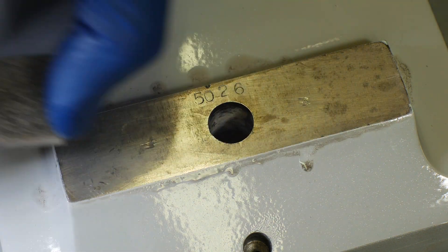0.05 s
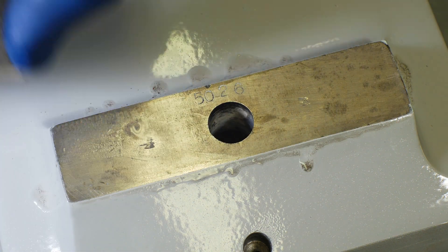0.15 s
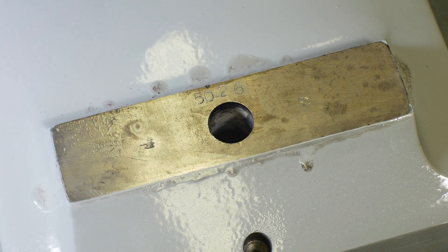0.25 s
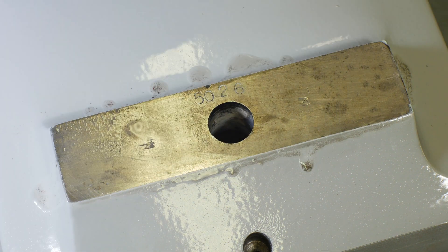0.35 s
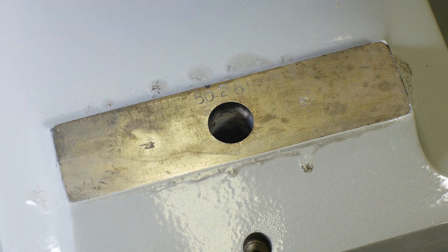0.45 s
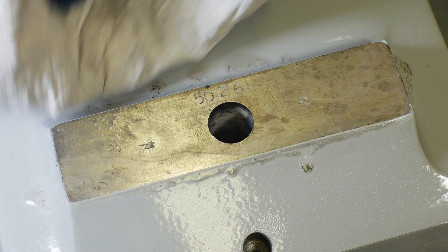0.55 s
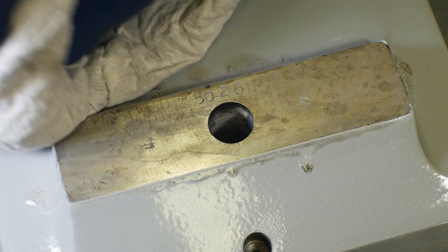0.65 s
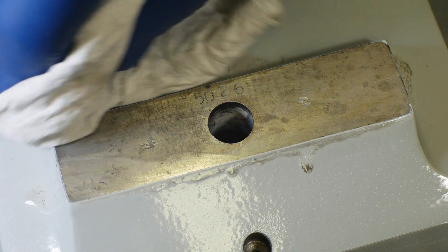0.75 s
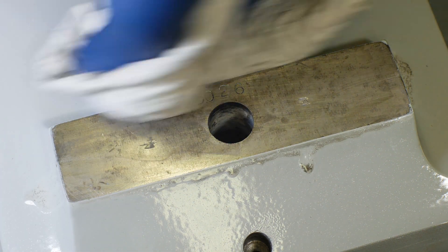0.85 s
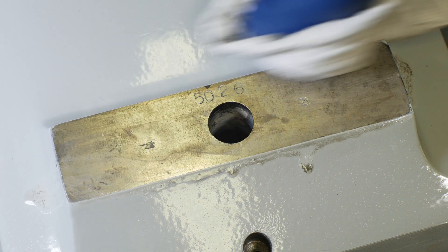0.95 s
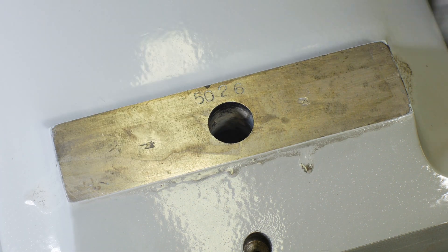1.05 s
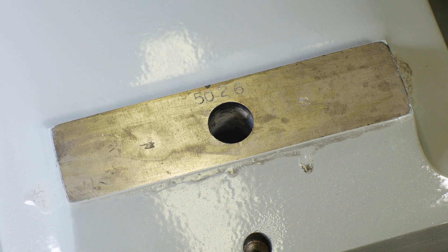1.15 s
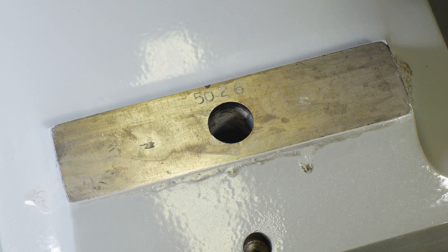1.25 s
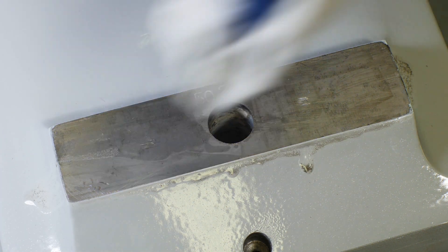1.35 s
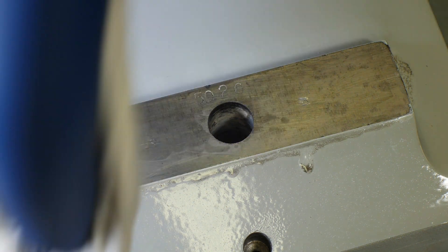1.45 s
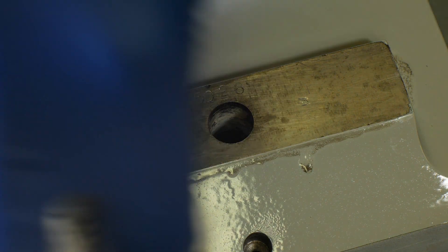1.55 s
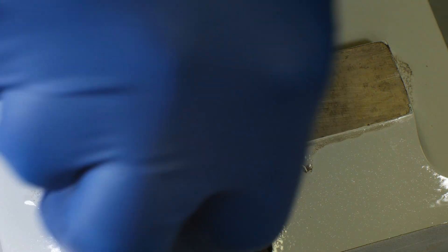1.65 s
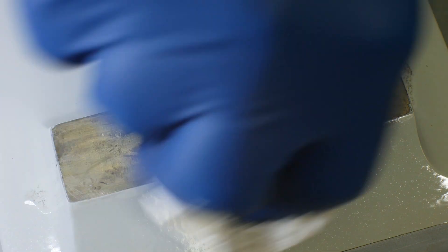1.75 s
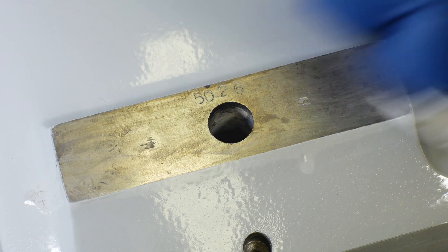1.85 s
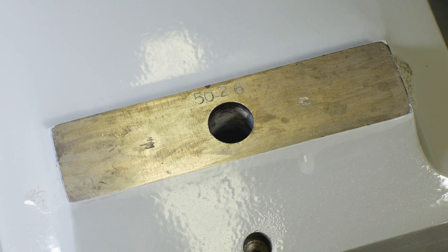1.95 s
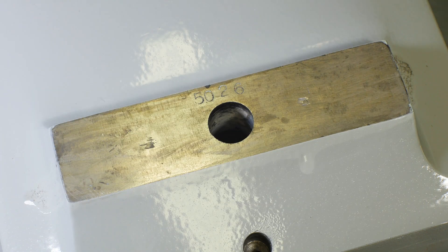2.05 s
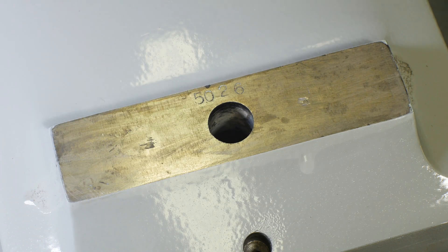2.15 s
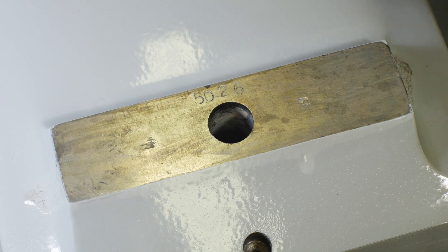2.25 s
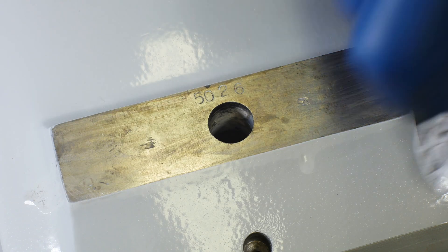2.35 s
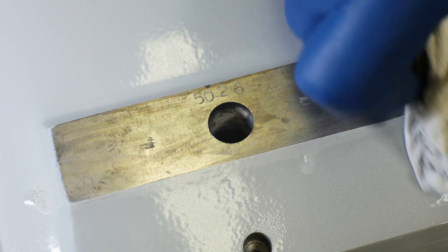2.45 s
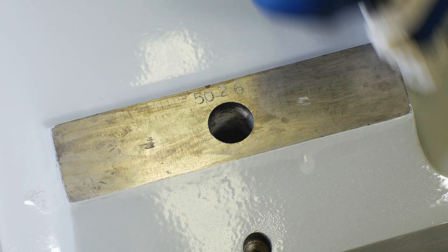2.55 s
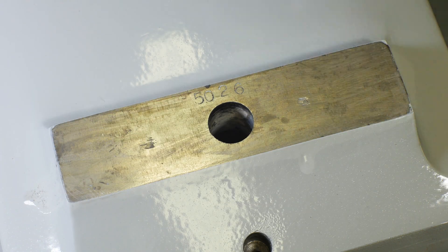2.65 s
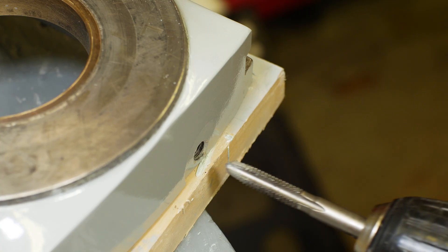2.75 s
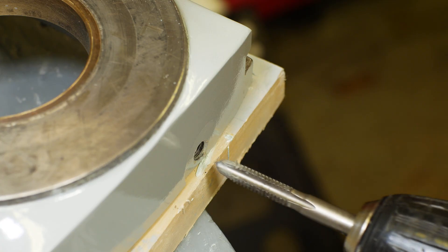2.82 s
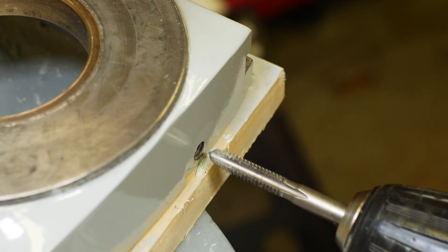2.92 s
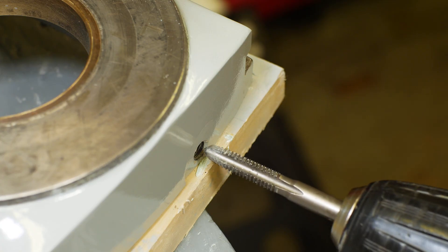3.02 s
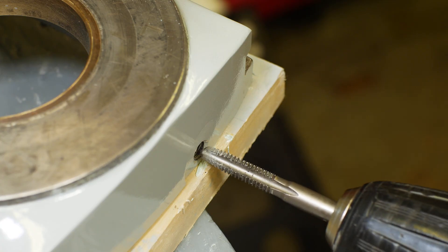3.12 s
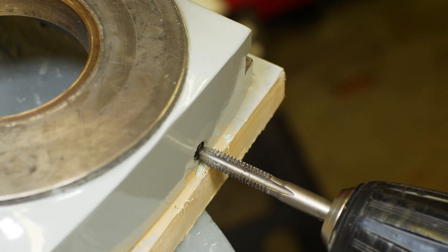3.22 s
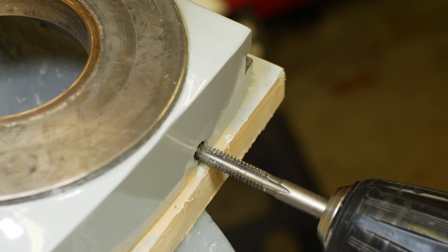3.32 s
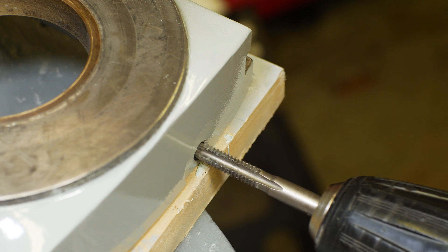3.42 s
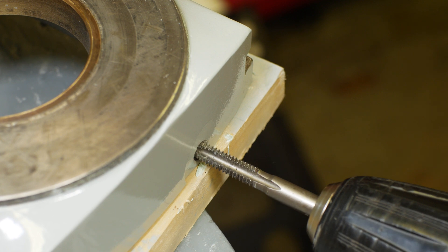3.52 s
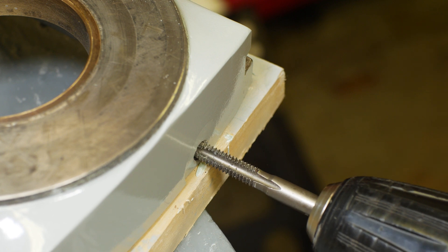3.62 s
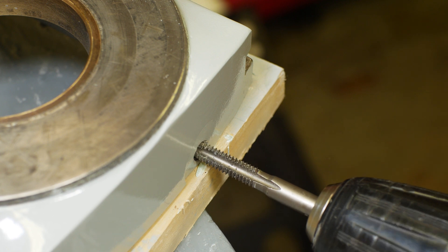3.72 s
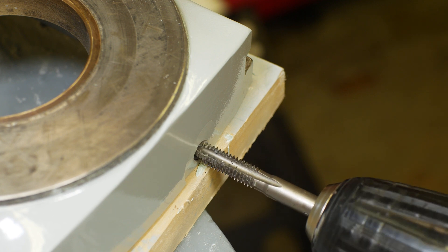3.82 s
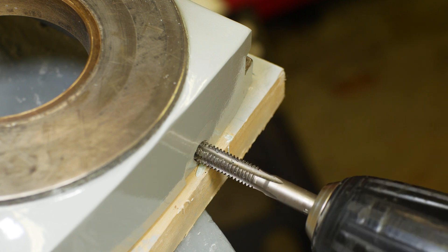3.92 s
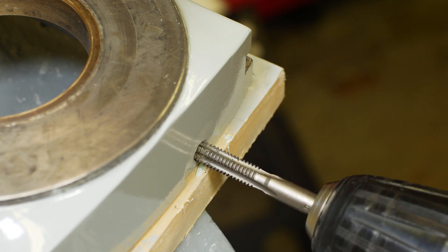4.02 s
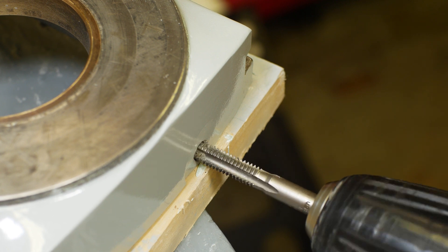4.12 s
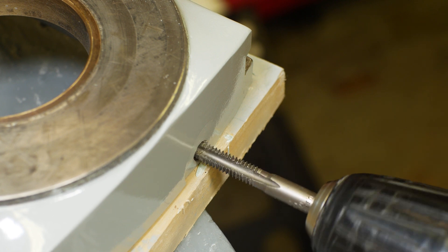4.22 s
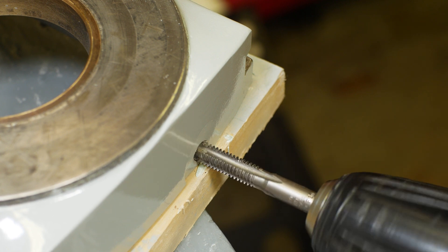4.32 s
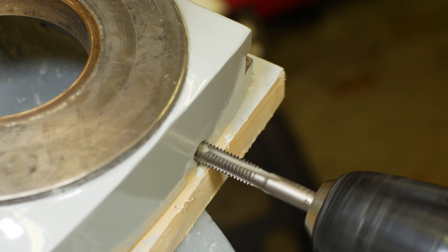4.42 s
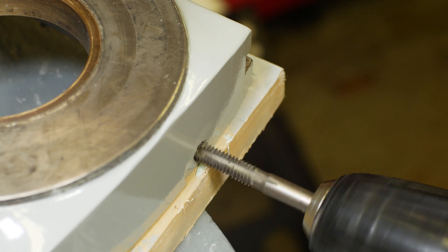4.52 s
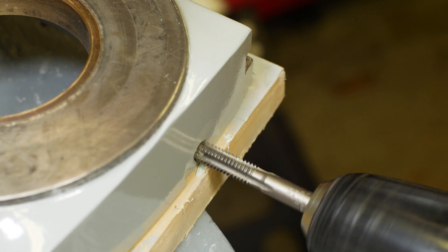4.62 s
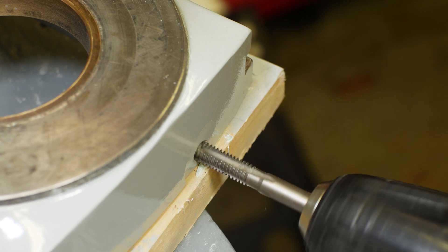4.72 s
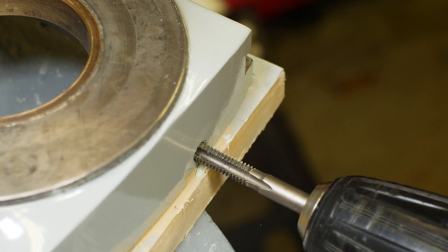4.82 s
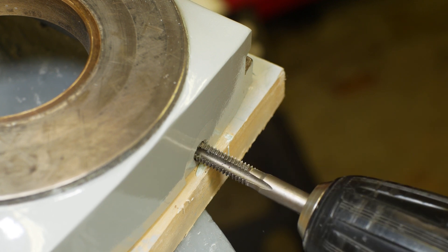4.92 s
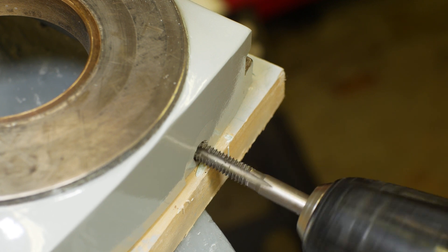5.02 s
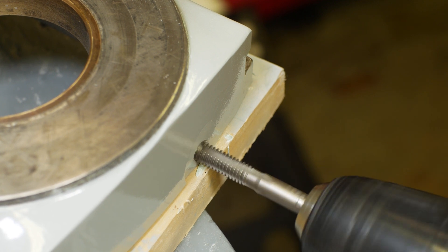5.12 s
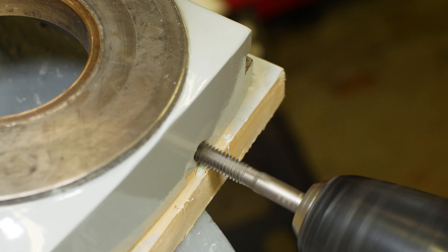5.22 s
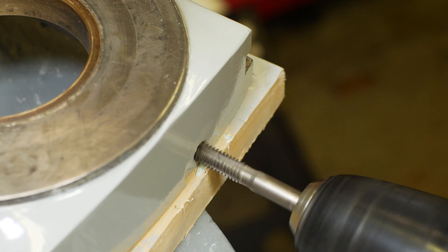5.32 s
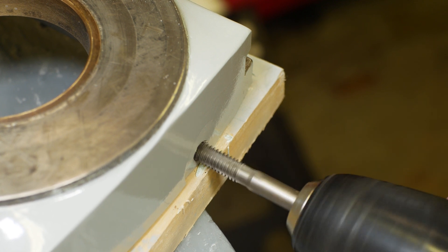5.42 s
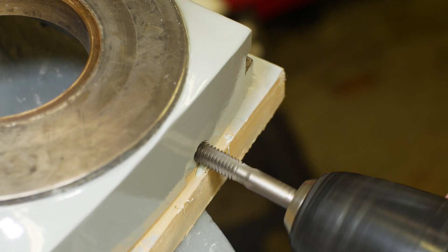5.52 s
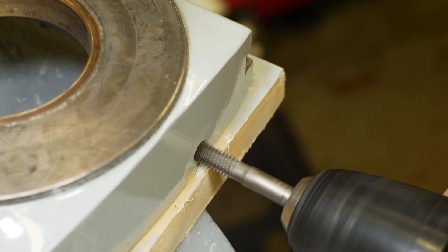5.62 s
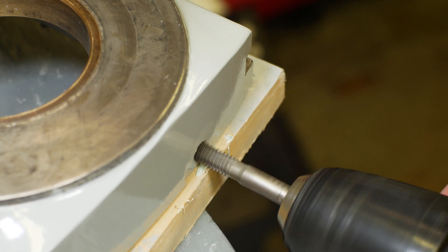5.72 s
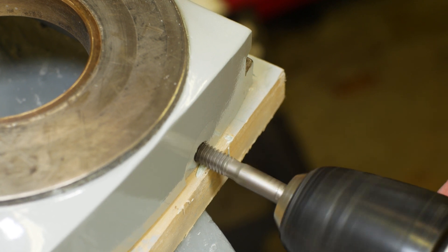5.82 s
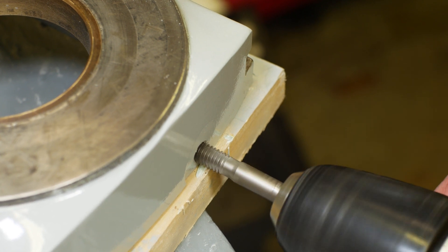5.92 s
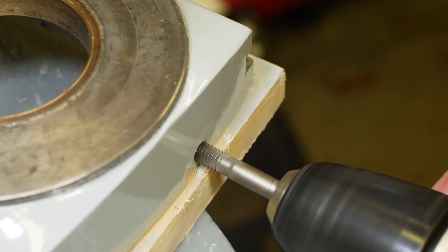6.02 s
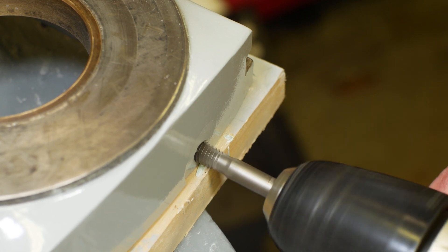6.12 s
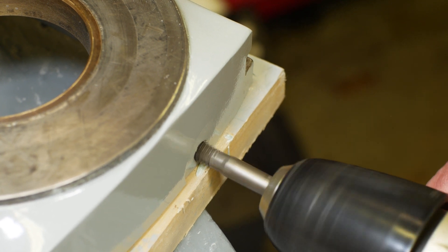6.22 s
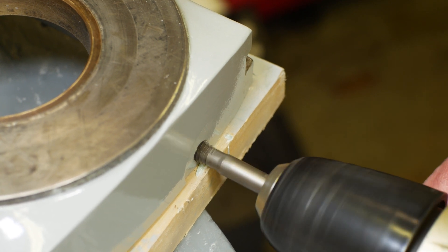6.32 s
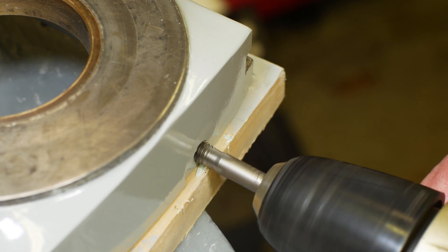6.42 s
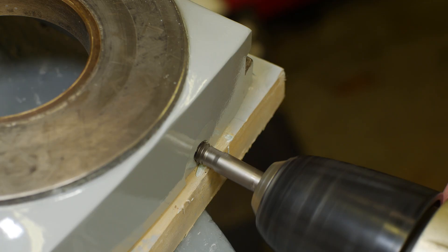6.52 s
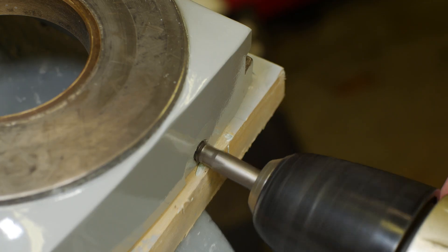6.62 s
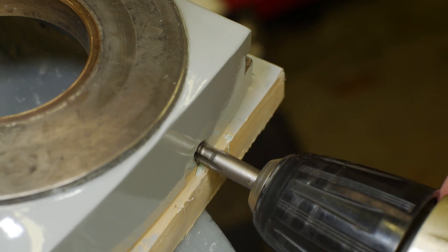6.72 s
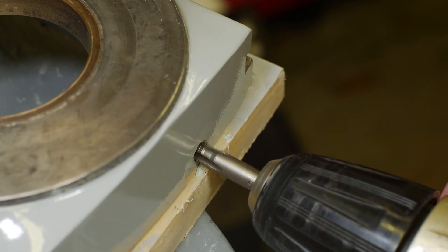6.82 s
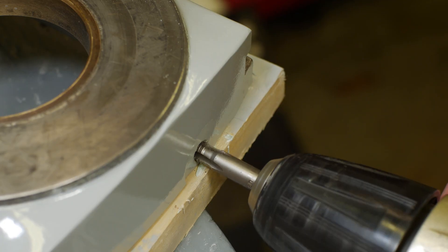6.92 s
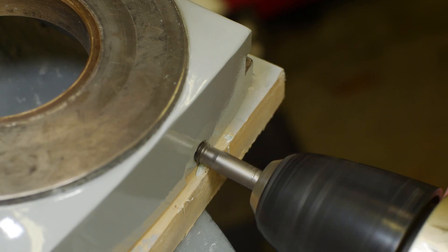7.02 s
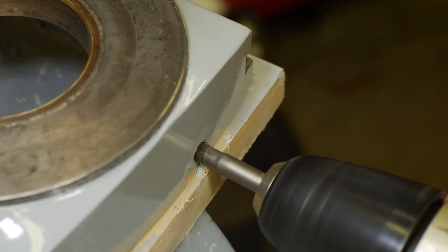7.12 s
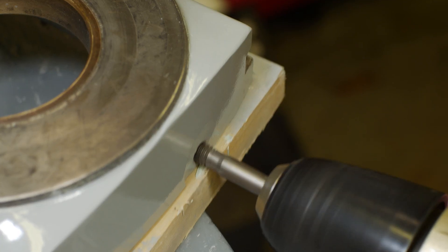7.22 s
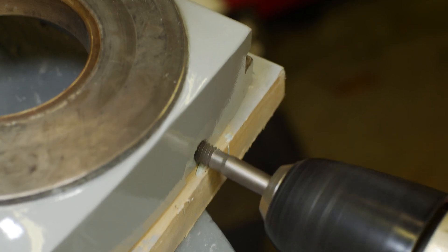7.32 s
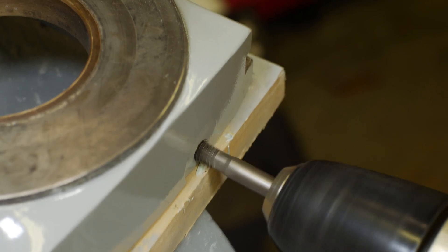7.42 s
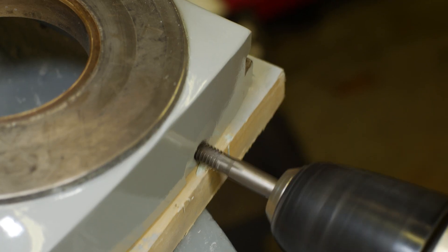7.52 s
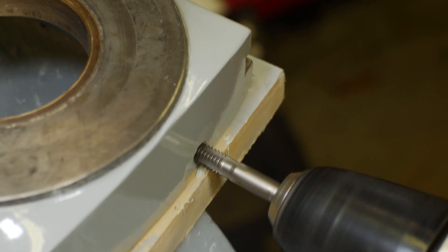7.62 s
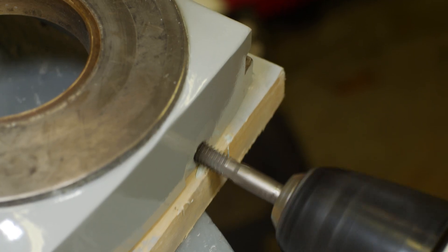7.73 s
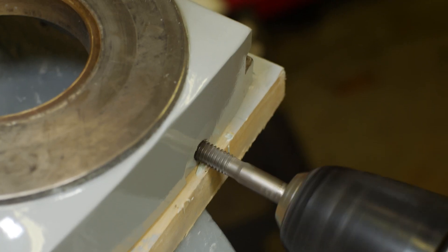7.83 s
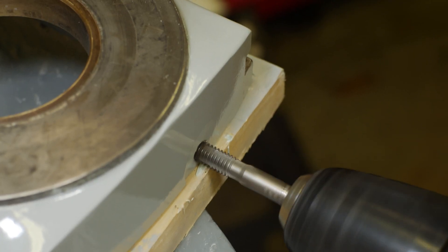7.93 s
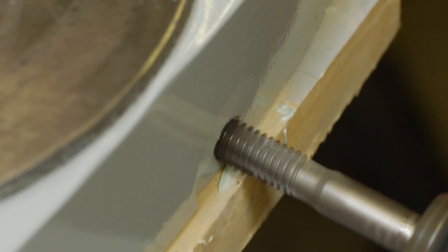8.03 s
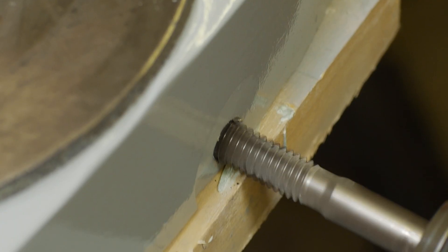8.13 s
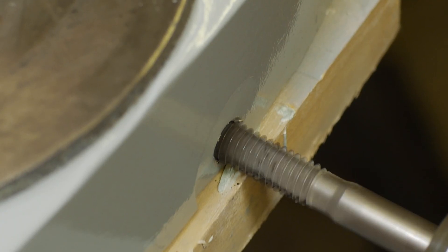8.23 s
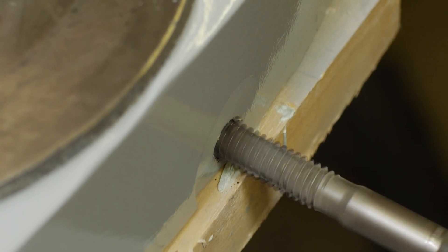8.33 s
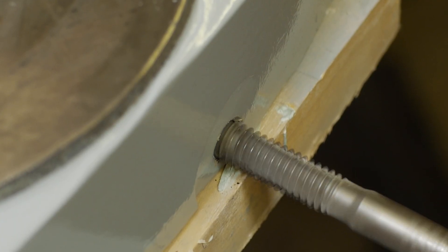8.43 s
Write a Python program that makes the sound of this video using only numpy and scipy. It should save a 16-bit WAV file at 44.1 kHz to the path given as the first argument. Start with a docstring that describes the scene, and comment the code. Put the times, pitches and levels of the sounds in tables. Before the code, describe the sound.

A close, nearly dry stereo scene in a quiet workshop with faint hiss and low mains hum. From 0 to 2.8 seconds a glove rustles softly and a stone makes short, faint gritty wipes over brass, with a dull double knock near 0.8, a click at 1.1 and quick scraping catches around 1.9 and 2.1. After a near-silent pause, a tap scuffs and bumps a hole at 3.5. From 3.7 the drill creeps, with a thin, wavering high whistle near 6 to 7 kilohertz and broken gear spurts, louder at 4.4 to 4.8. From 5.1 to 6.5 it churns strongly, rattling and throbbing, its whistle sliding down as it stalls. A short jerk follows at 6.6, then hard, sharp clacks at 7.0 as it reverses. It backs out in a steady whirring grind, gear tones climbing until the end near 8.4.

```python
"""Hand tapping with a cordless drill

A stone rasps over a brass pad on a casting (filtered grain noise) with soft knocks (damped modes) and clicks.
Then a drill drives a tap in: its speed control whistles (wavering sines), gears churn in spurts and stop
(grains over housing modes, gear tones), and the tap is backed out with rising gear tones.
Behind it, a quiet workshop: hiss and a mains hum."""
import sys
import numpy as np
from scipy import signal
from scipy.fft import rfft, irfft
from scipy.io import wavfile
from scipy.ndimage import map_coordinates

SR = 44100
rng = np.random.default_rng(int(sys.argv[2]) if len(sys.argv) > 2 else 0)


def master_out(mix):
    """Clip the mix to full scale and print it as 16-bit PCM to the path in sys.argv[1]."""
    frames = np.transpose(np.atleast_2d(mix))
    ceiling = np.clip(frames, -1, 1)
    pcm = np.round(ceiling * 32767).astype(np.int16)
    wavfile.write(sys.argv[1], SR, pcm)


N = 373086
T = np.arange(N) / SR
FREQ = np.maximum(np.fft.rfftfreq(N, 1 / SR), 1)

# Levels in the tables are relative: gains in the functions add to them.
# room noise spectrum: (frequency [Hz], level [dB])
AIR_SPECTRUM = [(25, -19), (60, 0.5), (95, 0), (160, 3), (260, -7), (800, -8.5), (1200, -13.5), (4000, -21),
                (10500, -24), (15000, -30)]
# mains hum lines: (frequency [Hz], rms level [dB])
HUM_LINES = [(119.8, -72)]
# wipes of the stone: (fastest moment [s], rise [s], fall [s], level [dB], treble change [dB],
# glove over stone [dB])
STROKES = [(.97, 0.11, 0.057, -55, 1, -17), (1.07, 0.059, 0.027, -70, 13.5, -19),
           (1.83, 0.061, 0.042, -57, -6, -28), (1.872, 0.026, 0.02, -51.5, 0.5, -5),
           (1.927, 0.032, 0.016, -60, 6, -5), (2.139, 0.019, 0.0099, -54.5, -7, -9),
           (2.335, 0.023, 0.015, -59, -6, -21), (2.565, 0.052, 0.045, -57.5, -11, -26),
           (2.625, 0.044, 0.035, -57, 7.5, -34)]
# gloved hand sliding on the casting: (start [s], end [s], glove level [dB], grit level [dB])
SLIDES = [(0.486, 1.13, -70, -73.5), (1.151, 1.664, -71, -75), (1.667, 1.968, -74, -76),
          (1.97, 2.045, -84, -80), (2.066, 2.788, -74, -71)]
# grit spectrum: (frequency [Hz], level [dB])
STONE_SPECTRUM = [(470, -43), (800, -12), (1290, -6.5), (2270, 0.5), (3080, -0.5), (6360, -4), (7740, -9.5),
                  (11200, -9.5), (15000, -24)]
# glove spectrum: (frequency [Hz], level [dB])
GLOVE_SPECTRUM = [(170, -4), (380, -2.5), (470, -5.5), (620, 1), (850, -9), (1300, -7), (1750, -3),
                  (3000, -14)]
# stone chattering on the pad edge: (hardest moment [s], rise [s], fall [s], level [dB])
CHATTERS = [(1.866, 0.013, 0.015, -45.5), (1.925, .004, 0.011, -52.5)]
# modes of the brass pad: (frequency [Hz], level [dB])
PAD_MODES = [(641, -4), (1130, -1.5), (1440, -3), (2380, -10), (3380, -10)]
# tap scuffing round the rim of the hole: (fastest moment [s], rise [s], fall [s], level [dB])
SCUFFS = [(3.485, 0.039, .025, -68.5), (3.52, 0.011, 0.033, -63)]
# scuff spectrum: (frequency [Hz], level [dB])
RIM_SPECTRUM = [(500, 6), (900, -1), (2000, 0), (3600, -4), (4600, -9)]
# dull bumps on the casting: (time [s], peak [dB], upper limit on mode t60 before a 0.98 factor [s])
BUMPS = [(0.051, -56, 0.14), (.777, -29, 0.15), (.787, -34, 0.12), (0.798, -33, 0.072), (0.839, -43, 0.25),
         (1.083, -43.5, 0.018), (1.926, -47, 0.046), (3.317, -66, 0.099), (3.471, -48.5, 0.17),
         (3.515, -40.5, 0.11), (3.526, -37, 0.081), (3.815, -56, 0.12), (3.843, -49.5, 0.33),
         (3.898, -55, 0.19), (4.325, -44, 0.31), (4.612, -32, 0.22)]
# low modes of the casting: (frequency [Hz], level [dB], longest t60 [s])
CASTING_MODES = [(136, 1, 0.15), (192, -1, 0.13), (278, 1, 0.3), (385, 3, 0.12), (570, -11, 0.04),
                 (668, -12, 0.14)]
# sharp contacts of stone, tap and drive: (time [s], peak [dB], centre [Hz],
# breadth [share of centre], t60 of the ring [s])
CLICKS = [(.051, -50, 10300, .06, .05), (.052, -51, 4500, .12, 0.045), (.368, -57.5, 2200, .15, 0.044),
          (.7245, -44.5, 2600, 0.55, .012), (1.081, -32, 1270, 1.6, 0.04), (1.849, -36, 1430, .55, .06),
          (1.923, -36, 2900, 0.4, 0.05), (2.138, -41, 2880, .55, .05), (2.309, -50, 2300, .55, 0.076),
          (3.515, -48, 2600, 0.44, .03), (3.518, -45, 880, .15, .11), (3.696, -52, 1500, .55, .04),
          (4.186, -46, 2100, .55, .04), (6.595, -31, 4200, .8, .04), (6.679, -30, 1800, 0.67, .04),
          (6.824, -46, 3300, 0.18, 0.04), (6.934, -43, 3400, .55, .04), (7.0043, -18, 2180, 1.2, .04),
          (7.0058, -20, 3600, .6, .045), (7.0072, -22, 1300, .7, .07), (7.0412, -18, 3500, .35, .01),
          (7.0768, -22.5, 3380, .3, .016)]
# speed control whistle, one row per catch: (start [s], end [s], pitch before sag and droop [Hz], level [dB])
WHISTLE = [(3.781, 4.118, 6900, -58.5), (4.134, 4.273, 6830, -55), (4.283, 4.405, 6950, -58),
           (4.414, 4.475, 6470, -53.5), (4.497, 4.545, 6330, -49.5), (4.603, 4.743, 6290, -46),
           (4.821, 4.892, 6900, -61), (5.139, 5.513, 6320, -46), (5.603, 5.665, 6330, -48),
           (5.69, 5.822, 6290, -45), (5.845, 5.915, 6300, -45), (5.95, 6.0, 6290, -46),
           (6.017, 6.355, 6290, -47), (7.09, 8.33, 6300, -48.5), (8.345, 8.44, 6300, -43.5)]
# load dragging the whistle down once the tap bites: (time [s], droop [Hz])
DROOP = [(4.95, 0), (5.14, 130), (5.37, 0), (5.51, 100), (5.6, 0), (7.08, 110), (7.37, 110), (7.53, 0),
         (7.88, 70), (8.06, 280), (8.16, 130)]
# whistle sliding near stall: (start [s], end [s], from [Hz], to [Hz], level [dB])
STALLS = [(4.123, 4.134, 6080, 6760, -57), (4.393, 4.415, 4700, 5830, -54.5),
          (4.475, 4.496, 3750, 4230, -43.5), (4.747, 4.783, 6000, 4900, -52),
          (4.78, 4.795, 4000, 3860, -42), (5.065, 5.095, 6500, 4630, -55),
          (5.088, 5.106, 3860, 4800, -42.5), (6.367, 6.5, 6160, 4130, -43),
          (6.595, 6.624, 3920, 4850, -38.5), (6.967, 7.085, 5100, 6200, -54)]
# motor shaft, one list per run at speed: (time [s], mean rate before load [turns/s], gear tone level [dB])
SHAFT_RUNS = [
    [(4.52, 172, -56), (4.56, 183, -48), (4.67, 181, -49), (4.83, 174, -54)],
    [(5.15, 172, -54), (5.65, 183, -47), (5.69, 222, -46), (5.73, 221, -42), (6.03, 232, -42),
     (6.38, 227, -43), (6.47, 181, -48)],
    [(7.06, 190, -52), (7.35, 217, -45), (7.45, 203, -50), (7.84, 200, -51), (7.91, 216, -45),
     (7.98, 213, -45), (8.04, 225, -42), (8.16, 254, -41.5), (8.28, 268, -48), (8.46, 284, -43)],
]
# gear tones: (multiple of the shaft rate, level [dB])
MESH = [(3, -8.5), (7, -1), (10, -8), (11, -8.5), (13, -3), (16, -8), (17, -4.5)]
# modes of drill housing and casting: (frequency [Hz], width [Hz], driving in [dB], backing out [dB])
HOUSING_MODES = [(671, 28, -20.5, -21.5), (845, 65, -16.5, -18.5), (1113, 40, -24.5, -25),
                 (1248, 65, -19, -19), (1575, 100, -16, -20), (1730, 45, -23, -24), (1900, 30, -27, -23.5),
                 (2165, 60, -20, -22), (2345, 105, -16.5, -19), (2500, 70, -20, -21), (2840, 40, -25, -21),
                 (2980, 170, -15.5, -21), (3400, 55, -23, -19.5), (3690, 130, -24, -19.5)]
# Stages of the drill's spurts, touching rows continuing one spurt; all three tables:
# (start [s], end [s], gear level [dB], shortfall at the start [dB], housing rumble over gears [dB],
# treble change [dB])
# the tap finds its way in: columns as above
CREEPS = [(3.70, 4.12, -73, -3, 1.5, 4.5), (4.128, 4.3, -65, 1.5, 1.5, 2), (4.3, 4.385, -67, -3, 5.5, 4),
          (4.4, 4.58, -43.5, 12.5, -2.5, -0.5), (4.575, 4.79, -41, -1, -5, -5.5),
          (4.79, 4.835, -45.5, -2.5, -5, -6), (4.84, 4.885, -60, -6, 2.5, -7)]
# the tap cuts: columns as above
CUTS = [(5.04, 5.08, -56, 9.5, -12, 10), (5.093, 5.24, -37.5, 7, -8, 0), (5.24, 5.6, -36.5, 2, -13.5, 1.5),
        (5.6, 6.42, -32.5, 1.5, -13.5, 2), (6.42, 6.53, -34, -3, -14, -1), (6.595, 6.705, -30.5, 3, -12, 1)]
# the tap is backed out: columns as above
BACKS = [(6.924, 6.975, -54.5, 8.1, -14, 1), (6.979, 7.005, -43, 1.3, -16, -8),
         (7.005, 8.46, -34, 2.3, -12, -2)]
# gear noise, low speed: (frequency [Hz], level [dB])
SLOW_SPECTRUM = [(450, -12.5), (1000, -2), (1550, 2), (2400, -3), (3800, -8), (6500, -9), (9800, -16),
                 (15000, -22)]
# gear noise, cutting: (frequency [Hz], level [dB])
FORWARD_SPECTRUM = [(450, -13), (580, -10), (1020, -5.5), (1450, -3.5), (1900, -4.5), (2400, -0.5),
                    (3000, -3), (3800, -5.5), (6200, -8), (6700, -12), (9800, -18.5), (15000, -32.5)]
# gear noise, backing out: (frequency [Hz], level [dB])
REVERSE_SPECTRUM = [(450, -17), (580, -9), (1080, -11.5), (1380, -7.5), (1950, -5), (2600, -3.5),
                    (3600, -4.5), (4600, -8.5), (6100, -7), (6700, -12), (10500, -17.5), (15000, -28)]
# rumble, low speed: (frequency [Hz], level [dB])
CREEP_RUMBLE = [(60, -19), (140, -2.5), (240, 0), (310, -12.5), (390, -3), (450, -8.5), (520, -21)]
# rumble, working speed: (frequency [Hz], level [dB])
WORK_RUMBLE = [(26, -49), (45, -21.5), (97, -14), (138, 1.5), (167, -5.5), (249, -1), (281, -11), (328, -4),
               (360, 2), (419, 2), (520, -11), (680, -64)]

AIR_DB = -73
HUM_DROP_S, HUM_EARLY_DB, HUM_LATE_DB = 2.8, 4, 1.5  # hum gain before and after the drop
STROKE_SHAPE = 1.52  # 1 = pointed swell, 2 = bell
SLIDE_FADE_S = 0.014
PAD_WIDTH_HZ = 210
DROOP_DB_PER_HZ = .015  # whistle weakens as it droops
SETTLE_S, FALL_DB_PER_S, ENGAGE_S = 0.07, 323, 0.0036  # level within a stage, after it, at its onset
FALL_DULLING = 0.15  # dB of treble lost per dB of gear level fall
RUMBLE_FALL = .62  # rumble decay as a share of the gears' rate
THROB_HZ, THROB_PEAK_S = 10.3, 6.025  # cutting load swells as the flutes come round
THROB_RUMBLE_DB = 2.5
THROB_SLOWING = .015  # share of shaft speed lost at each swell of the load
PATCHY_DB, PATCHY_BELOW_DB = 2.2, -55  # the tap scrapes unevenly while the gears are this quiet
MODE_LIFT_DB = 4  # a gear tone swells as it crosses a housing mode
TOP_HZ = 15200


def undb(db):
    """Decibels to gain."""
    return np.exp(np.asarray(db) * (np.log(10) / 20))


def unit(x):
    """Scale to rms 1."""
    return x / np.sqrt(np.mean(x ** 2))


def shape(points):
    """Gain at every frequency from (Hz, dB) points, falling steeply beyond the ends."""
    hz, db = np.transpose(points)
    gain = undb(np.interp(np.log(FREQ), np.log(hz), db))
    return gain / np.sqrt((1 + (hz[0] / FREQ) ** 10) * (1 + (FREQ / hz[-1]) ** 10))


def through(x, response):
    """Filter by a frequency response, to rms 1."""
    return unit(irfft(rfft(x) * response, N))


def walk(rate_hz):
    """Random wander through rate_hz new values a second, spread a little under 1."""
    steps = rng.standard_normal(N // 20)
    return np.interp(T * rate_hz, np.arange(len(steps)), steps)


def grains(rate_hz, scatter_db):
    """Tiny impacts of random sign and uneven size, rate_hz a second, to rms 1."""
    hit, out = rng.random(N) < rate_hz / SR, np.zeros(N)
    size, push = rng.standard_normal((N // 2, 2))[:hit.sum()].T
    out[hit] = np.sign(push) * undb(scatter_db * size)
    return unit(out)


def highs(x, split_hz):
    """The part above split_hz."""
    return irfft(rfft(x) / (1 + (split_hz / FREQ) ** 10), N)


def brighten(x, change_db, split_hz):
    """Raise or lower the part above split_hz."""
    return x + (undb(change_db) - 1) * highs(x, split_hz)


def resonate(x, hz, width_hz):
    """One mode kept ringing by x, to rms 1."""
    mode = signal.tf2sos(*signal.iirpeak(hz, hz / width_hz, fs=SR))
    return unit(signal.sosfilt(np.vstack([mode, mode]), x))


def gate(start_s, end_s, edge_s=0.0037):
    """1 from start to end, with soft edges outside."""
    return np.clip(np.minimum(T - start_s, end_s - T) / edge_s + 1, 0, 1)


def swell(peak_s, rise_s, fall_s):
    """A rub gathers speed up to peak_s and slows again."""
    distance = np.abs((T - peak_s) / np.where(T < peak_s, rise_s, fall_s))
    return np.exp(-np.minimum(distance ** STROKE_SHAPE, 20))


def add(out, at_s, sound, peak_db):
    """Mix a sound in at at_s with the given peak level."""
    start = int(at_s * SR)
    out[start:start + len(sound)] += (undb(peak_db) * sound / np.abs(sound).max())[:N - start]


def place(x, pan_db, wet_db, t60_s):
    """Direct sound (positive pan = left) plus short reflections, mostly from the sides, treble-rich."""
    t = T[:SR // 4]
    tails = rng.standard_normal((2, len(t))) * undb(-60 * t / t60_s) * (t > .002)
    front, side = tails / np.sqrt(2 * np.sum(tails ** 2, axis=1, keepdims=True))
    tails = .4 * front + side * np.array([[1], [-1]])
    for hz, lift in [(550, 0.6), (7500, 0.18)]:
        tails = tails + lift * signal.lfilter(*signal.butter(1, hz, "high", fs=SR), tails)
    direct = x * undb([[pan_db / 2], [-pan_db / 2]])
    return direct + undb(wet_db - 6.0) * signal.oaconvolve(x[None], tails, axes=1)[:, :N]


def workshop():
    """Faint hiss, its side part a little stronger than its middle, and a hum that drops at HUM_DROP_S."""
    mid, side = (through(rng.standard_normal(N), shape(AIR_SPECTRUM)) for _ in range(2))
    side = brighten(side * undb(1.5), 0.49, 320)
    hum = sum(np.sqrt(2) * undb(db) * np.sin(2 * np.pi * hz * T) for hz, db in HUM_LINES)
    hum_db = HUM_LATE_DB + (HUM_EARLY_DB - HUM_LATE_DB) * gate(0, HUM_DROP_S, .05)
    return undb(AIR_DB) * (mid + side * np.array([[1], [-1]])) + hum * undb(hum_db)


def bumps(gain_db=-2.5, push_s=0.0021):
    """Soft blows ring the low modes of the casting on its bench, which radiates no deep bass."""
    out, t = np.zeros(N), T[:SR // 3]
    for s, peak_db, ring_s in BUMPS:
        ringing = 0
        for hz, db, t60_s in CASTING_MODES:
            decay = undb(db - 60 * t / min(t60_s, 0.98 * ring_s))
            cycles = hz * t * (1 + 0.022 * rng.standard_normal()) + rng.random()
            ringing = ringing + decay * np.sin(2 * np.pi * cycles)
        add(out, s, ringing * (1 - np.exp(-t / push_s)), peak_db + gain_db)
    return signal.sosfilt(signal.butter(3, 110, "high", fs=SR, output="sos"), out)


def clicks(gain_db=-3.5, crack_s=0.00015, tail=0.5, skirt=0.067):
    """A hard crack and a short dense ring for each contact: decaying noise through a band."""
    out, t = np.zeros(N), T[:SR // 5]
    for s, peak_db, hz, breadth, ring_s in CLICKS:
        decay = np.exp(-t / crack_s) + tail * np.exp(-np.log(1000) * t / ring_s)
        burst = rng.standard_normal(len(t)) * decay
        edges_hz = [hz / (1 + breadth), min(hz * (1 + breadth), SR / 3)]
        band = signal.butter(1, edges_hz, "band", fs=SR, output="sos")
        once = signal.sosfilt(band, burst)
        add(out, s, signal.sosfilt(band, once) + skirt * once, peak_db + gain_db)
    return out


def scuff():
    """The tip of the tap drags over the painted rim: filtered grains."""
    rub = sum(undb(db) * swell(s, rise_s, fall_s) for s, rise_s, fall_s, db in SCUFFS)
    return rub * through(grains(1200, 2.0), shape(RIM_SPECTRUM))


def chatter():
    """The stone catches and skips, ringing the brass pad."""
    catches = grains(1200, 2.5)
    ringing = unit(sum(undb(db) * resonate(catches, hz, PAD_WIDTH_HZ) for hz, db in PAD_MODES))
    return sum(undb(db) * swell(s, rise_s, fall_s) for s, rise_s, fall_s, db in CHATTERS) * ringing


def stone(split_hz=4700):
    """Grit rasps unevenly over brass, brighter on some strokes; the glove rustles below."""
    rasp = through(grains(6000, 2.8), shape(STONE_SPECTRUM))
    glove = through(grains(1500, 3.2), shape(GLOVE_SPECTRUM))
    treble, out = highs(rasp, split_hz), 0
    for s, rise_s, fall_s, db, treble_db, glove_db in STROKES:
        rub = rasp + (undb(treble_db) - 1) * treble + undb(glove_db) * glove
        out = out + undb(db) * swell(s, rise_s, fall_s) * rub
    for start, end, glove_db, grit_db in SLIDES:
        out = out + gate(start, end, SLIDE_FADE_S) * (undb(glove_db) * glove + undb(grit_db) * rasp)
    return out * undb(1.0 * walk(41.7))


def whistle(sag_hz=200, settle_s=0.011, jitter_hz=28, octave_db=-25, gain_db=2.5, flutter=0.39):
    """Switched current sings in the windings and flutters with the commutator; inrush drags the pitch down."""
    hz, size = np.zeros(N), np.zeros(N)
    for start, end, pitch_hz, db in WHISTLE:
        on = gate(start, end)
        sag = sag_hz * np.exp(-np.maximum(T - start, 0) / settle_s)
        hz = np.where(on > 0, pitch_hz - sag, hz)
        size = np.maximum(size, on * undb(db + gain_db))
    droop_hz = np.interp(T, *np.transpose(DROOP)) + 25 * walk(25) * (T > 4.5)
    phase = 2 * np.pi * np.cumsum(hz - droop_hz + jitter_hz * walk(300)) / SR
    tone = np.sin(phase) + undb(octave_db) * np.sin(2 * phase)
    return size * undb(-DROOP_DB_PER_HZ * droop_hz) * (1 + flutter * walk(140)) * tone


def stalls(hoarse_hz=900):
    """The whistle breaks into a narrow rasp and slides in pitch when the motor starts, stops or labours."""
    rasp, out = walk(hoarse_hz) + 1j * walk(hoarse_hz), np.zeros(N)
    for start, end, from_hz, to_hz, db in STALLS:
        size = gate(start, end)
        on = size > 0
        phase = 2 * np.pi * np.cumsum(np.interp(T[on], [start, end], [from_hz, to_hz])) / SR
        out[on] += undb(db) * size[on] * np.real(rasp[on] * np.exp(1j * phase))
    return out


def throb():
    """The cutting load, swinging between -1 and 1."""
    return np.cos(2 * np.pi * THROB_HZ * (T - THROB_PEAK_S))


def gear_tones(fade_s=.03, rough=.009, wander=.003, flicker_db=3.8, gain_db=-3):
    """Meshing teeth sing at multiples of the shaft rate, which dips with the load; each tone wavers."""
    slowing, out = THROB_SLOWING * throb() * (T < BACKS[0][0]), np.zeros(N)
    near_mode = sum(1 / (1 + ((FREQ - hz) / width_hz) ** 2) for hz, width_hz, _, _ in HOUSING_MODES)
    near_mode = np.minimum(near_mode, 1)
    for run in SHAFT_RUNS:
        s, hz, db = np.transpose(run)
        size = gate(s[0], s[-1], fade_s) * undb(np.interp(T, s, db) + gain_db)
        on = size > 0
        shaft_hz = (np.interp(T, s, hz) * (1 - slowing + rough * walk(300)))[on]
        for multiple, tone_db in MESH:
            tone_hz = multiple * shaft_hz * (1 + wander * walk(60)[on])
            lift_db = MODE_LIFT_DB * np.interp(tone_hz, FREQ, near_mode)
            level_db = tone_db + lift_db + flicker_db * walk(45)[on]
            out[on] += size[on] * undb(level_db) * np.sin(2 * np.pi * np.cumsum(tone_hz) / SR)
    return out


def housing(drift=.005):
    """Gear teeth keep each mode ringing; it swells, fades and drifts in pitch as the load shifts."""
    teeth, out = grains(5000, 4.0), 0
    for hz, width_hz, in_db, out_db in HOUSING_MODES:
        read_at = np.cumsum(1 + drift * walk(14))  # uneven reading bends the pitch
        drifting = map_coordinates(resonate(teeth, hz, width_hz), [read_at], order=1, mode="mirror")
        out = out + undb([[in_db], [out_db]]) * undb(2.6 * walk(14)) * drifting
    return out


def effort(stages):
    """Each stage settles to its level, then falls and dulls after its end: gear gain, rumble gain, treble dB."""
    gear, rumble, treble = np.zeros((3, N))
    for start, end, db, short_db, rumble_db, treble_db in stages:
        shortfall_db = short_db * np.exp(-np.maximum(T - start, 0) / SETTLE_S)
        fall_db = FALL_DB_PER_S * np.maximum(T - end, 0)
        size = gate(start, T[-1], ENGAGE_S) * undb(db - shortfall_db - fall_db)
        treble = np.where(size > gear, treble_db - FALL_DULLING * fall_db, treble)
        gear = np.maximum(gear, size)  # the louder stage wins
        rumble = np.maximum(rumble, size * undb(rumble_db + (1 - RUMBLE_FALL) * fall_db))
    return gear, rumble, treble


def gears(stages, colour, body, ringing, gain_db, load=0):
    """Gear teeth clatter over the ringing housing; the drill body rumbles in lumps underneath."""
    gear, shake, treble_db = effort(stages)
    teeth = grains(7000, 2.75) * undb(1.6 * walk(60) + 1.2 * walk(400))
    clatter = brighten(through(teeth, shape(colour)), treble_db, 6800)
    rumble = through(grains(900, 3.3), shape(body)) * undb(1.3 * walk(25))
    patches = undb(PATCHY_DB * walk(70) * (gear < undb(PATCHY_BELOW_DB)))
    noise = undb(-1.3) * clatter + undb(4.0) * ringing
    return gear * patches * undb(gain_db) * noise + shake * undb(THROB_RUMBLE_DB * load - 1.2) * rumble


def drill():
    """The tap creeps in, cuts with a throbbing rumble and runs out; the housing rings differently each way."""
    ring_in, ring_out = housing()
    creeping = gears(CREEPS, SLOW_SPECTRUM, CREEP_RUMBLE, undb(-2) * ring_in, -0.3)
    cutting = gears(CUTS, FORWARD_SPECTRUM, WORK_RUMBLE, ring_in, -1.7, throb())
    backing = gears(BACKS, REVERSE_SPECTRUM, WORK_RUMBLE, ring_out, -0.1)
    return creeping + cutting + backing


def scene():
    """Bench work, then the drill: its rumble slightly to the left, its gears to the right."""
    tones, machine = whistle() + stalls() + gear_tones(), drill()
    clatter = highs(machine, 560)
    rubs = place(stone() + chatter() + scuff(), -.3, -4.5, 0.038)
    knocks = place(bumps(), 0.65, -6.0, 0.34) + place(clicks(), -0.54, -9.0, 0.11)
    rumbling = place(machine - clatter, 0.91, -6.0, 0.11)
    churning = place(clatter, -1.2, -3.5, 0.066)
    singing = place(tones, -1.1, -7.5, 0.25)
    return workshop() + rubs + knocks + rumbling + churning + singing


def record(dry):
    """The recorder cuts the top, steeply above TOP_HZ."""
    return signal.sosfilt(signal.ellip(10, .2, 70, TOP_HZ, fs=SR, output="sos"), dry)


dry = scene()
out = record(dry)
master_out(out)
```